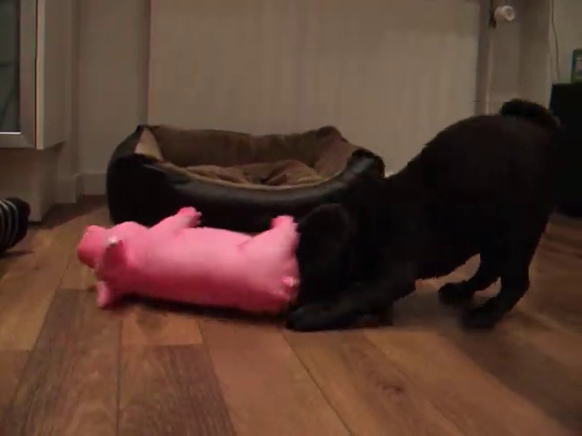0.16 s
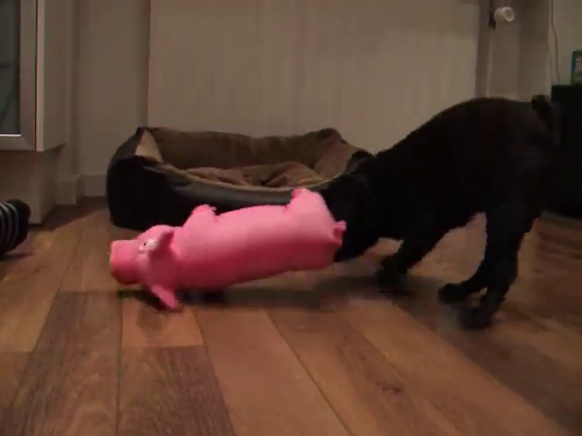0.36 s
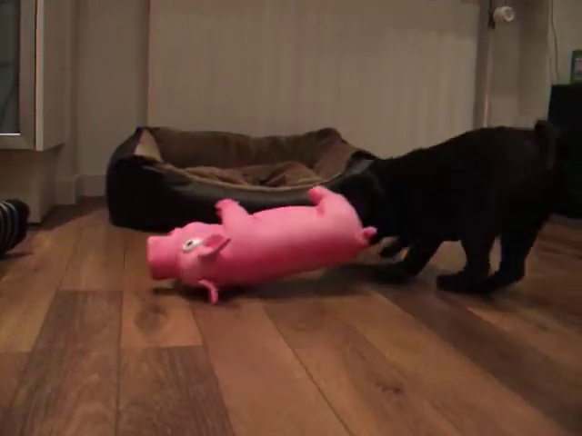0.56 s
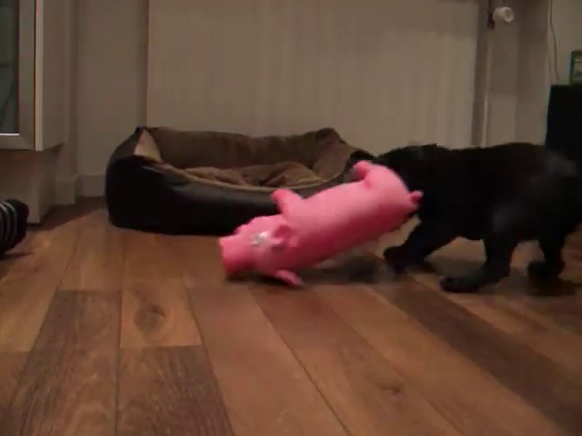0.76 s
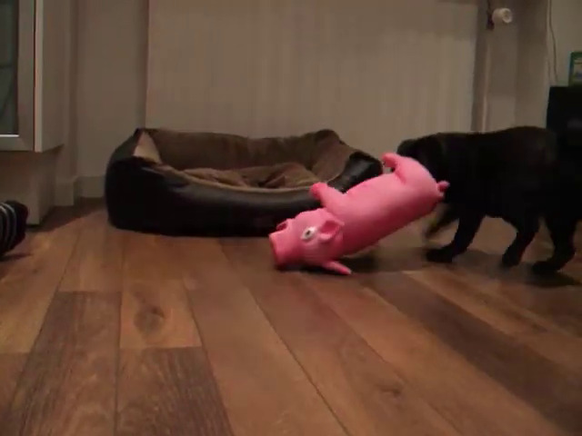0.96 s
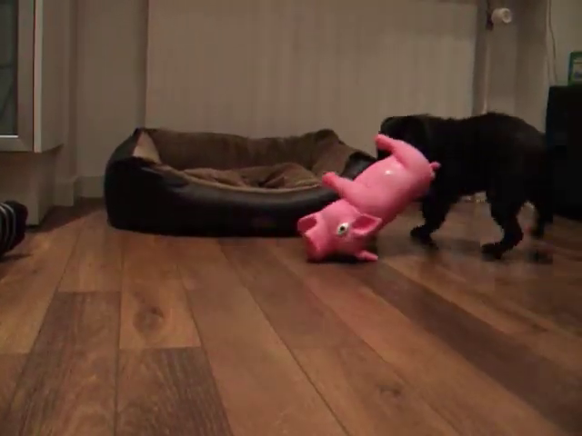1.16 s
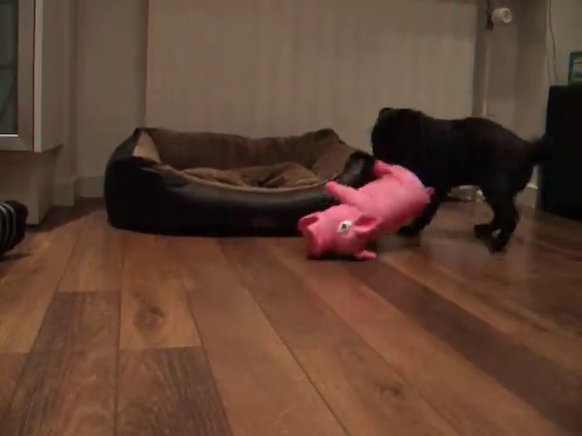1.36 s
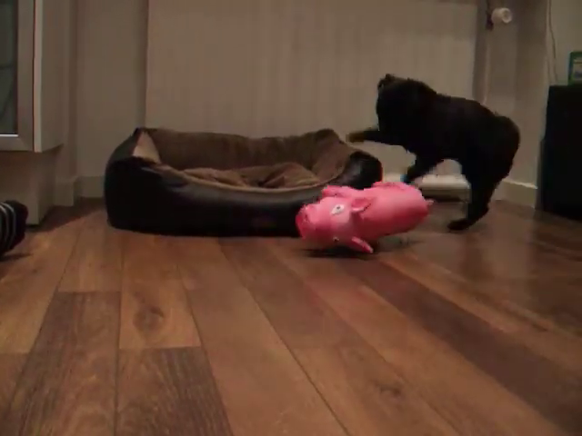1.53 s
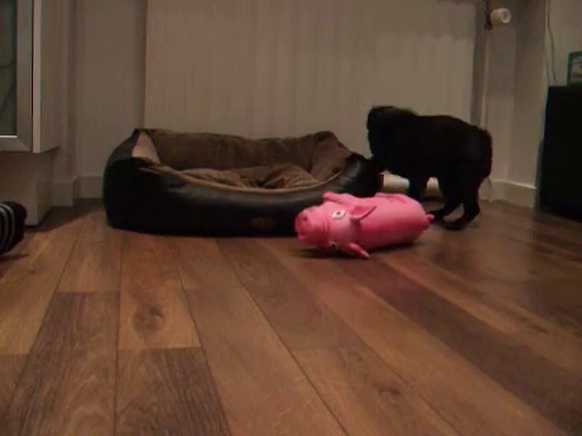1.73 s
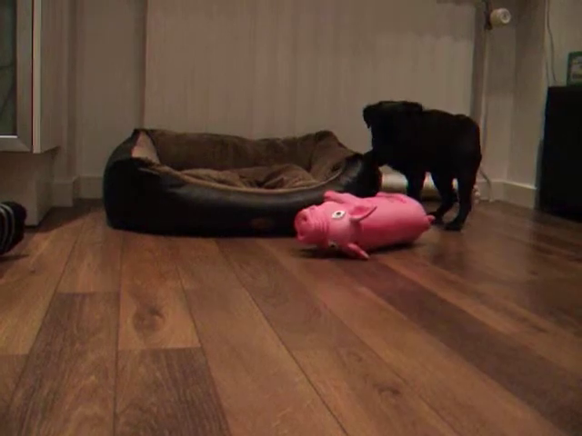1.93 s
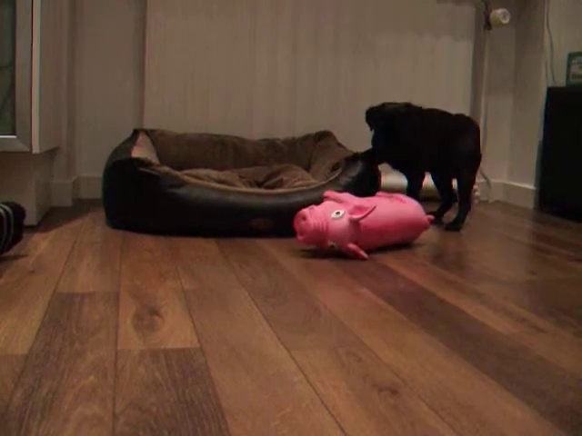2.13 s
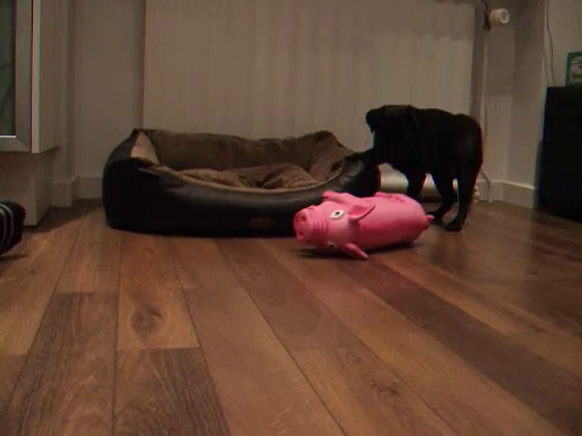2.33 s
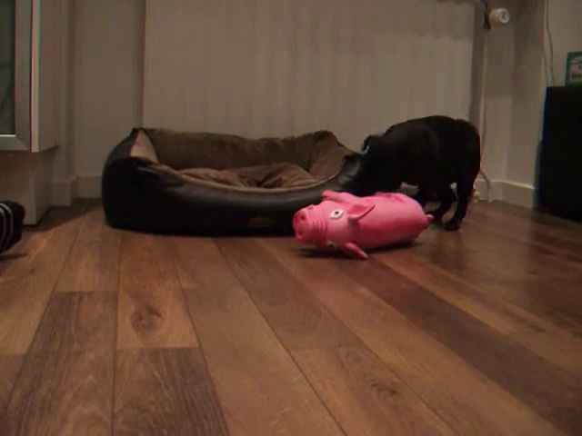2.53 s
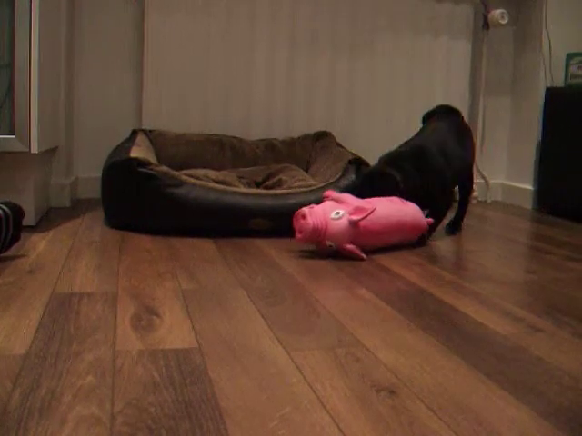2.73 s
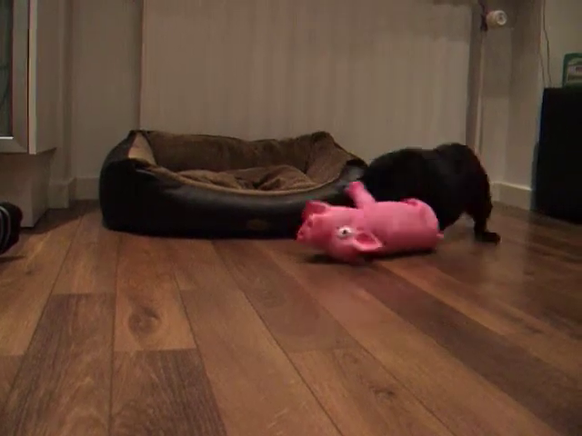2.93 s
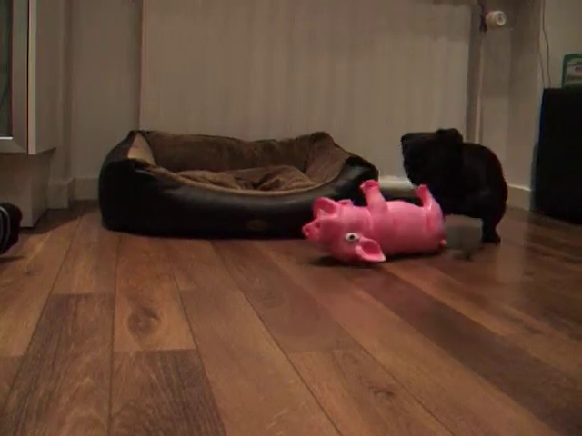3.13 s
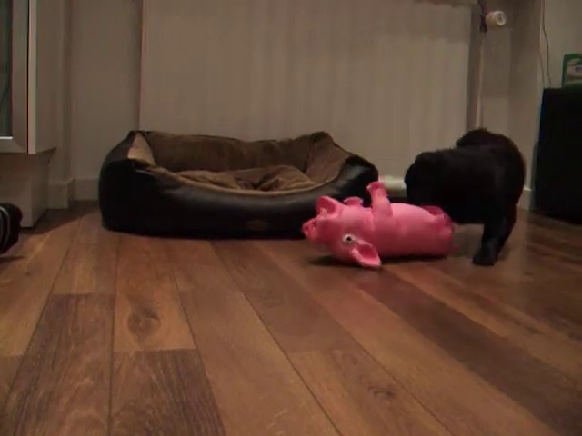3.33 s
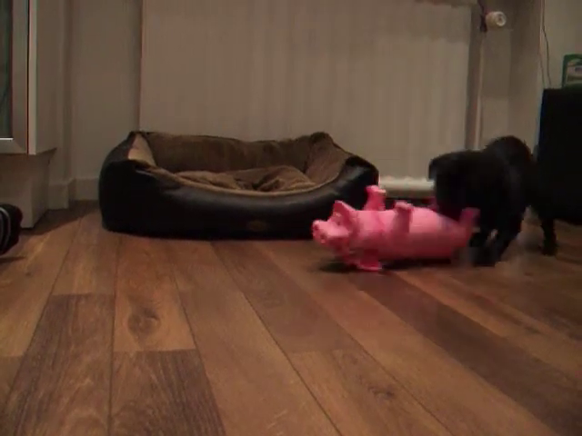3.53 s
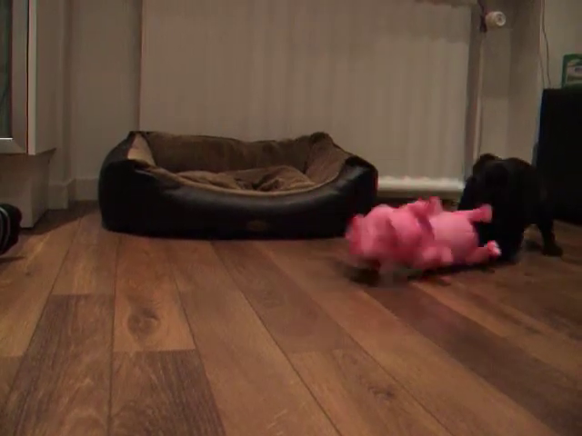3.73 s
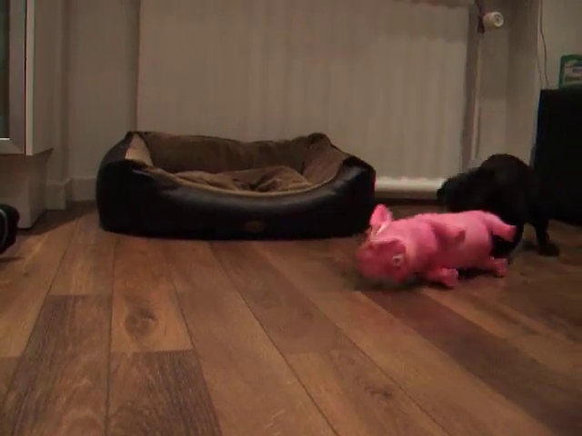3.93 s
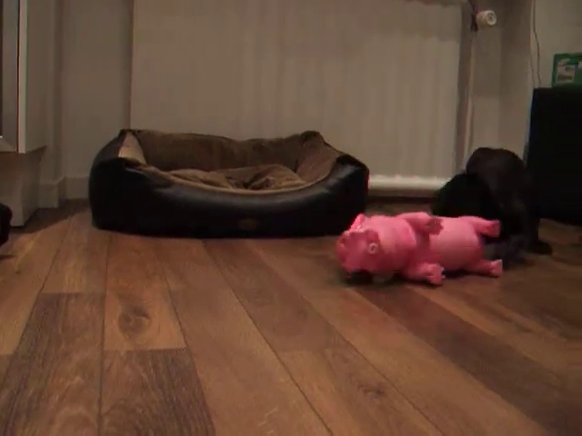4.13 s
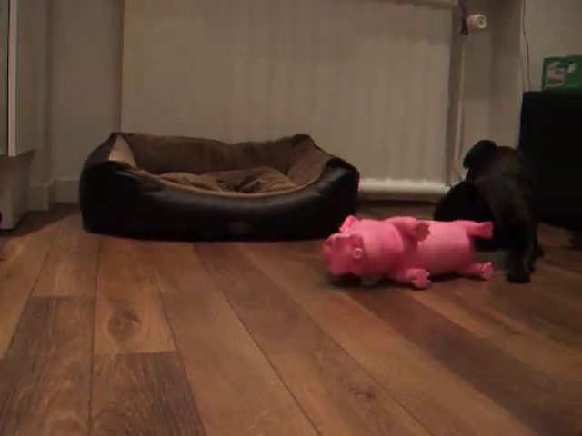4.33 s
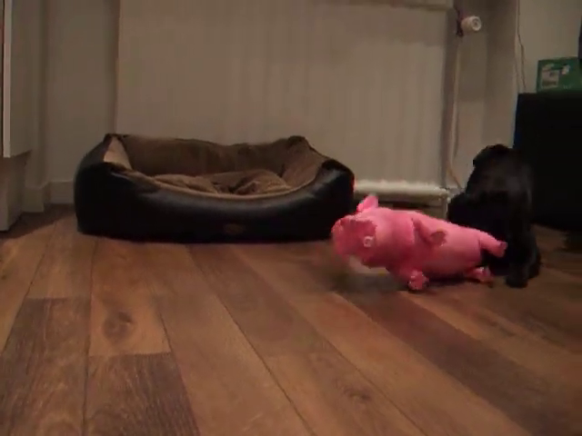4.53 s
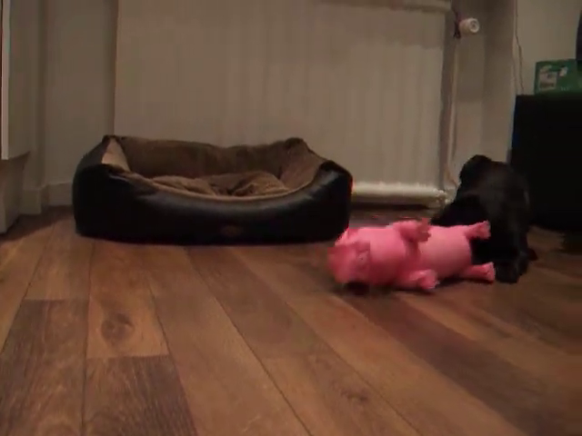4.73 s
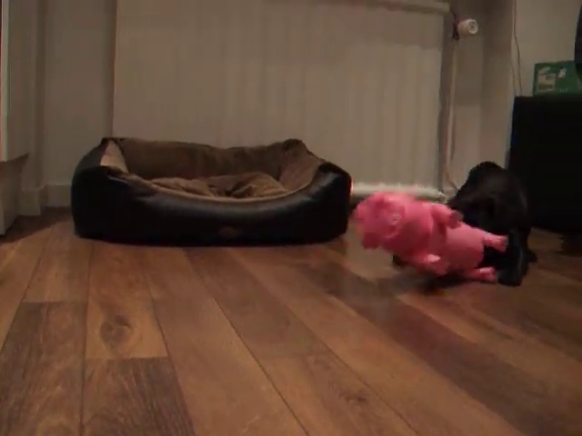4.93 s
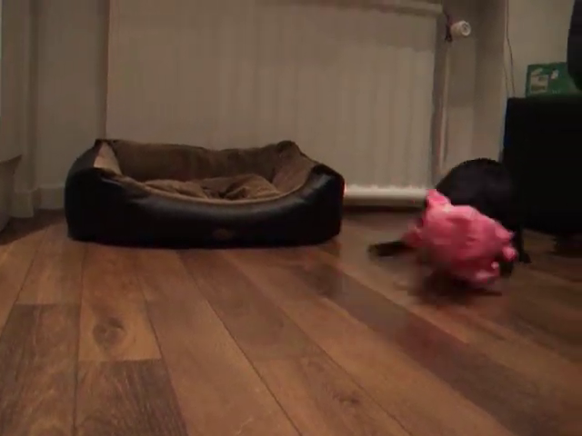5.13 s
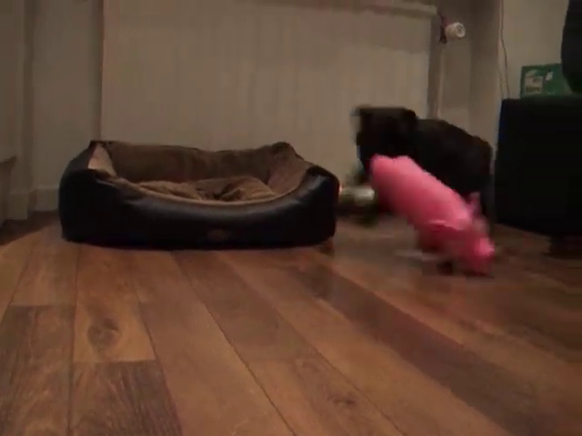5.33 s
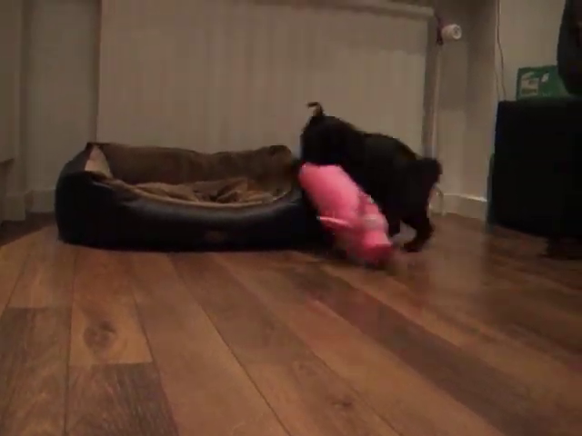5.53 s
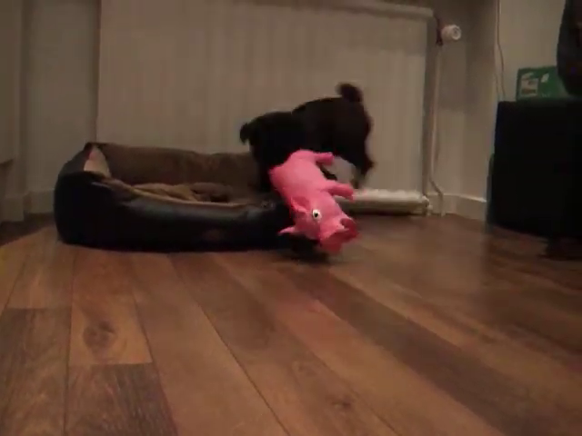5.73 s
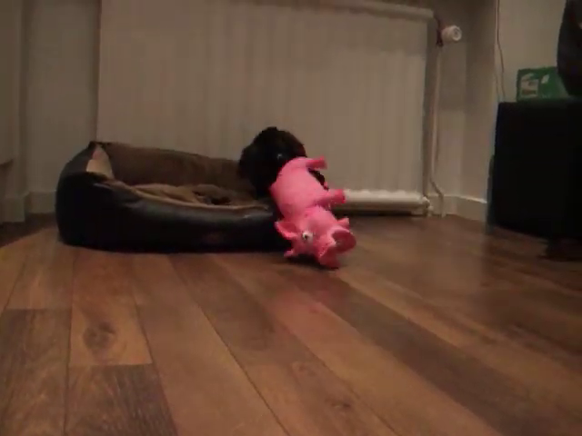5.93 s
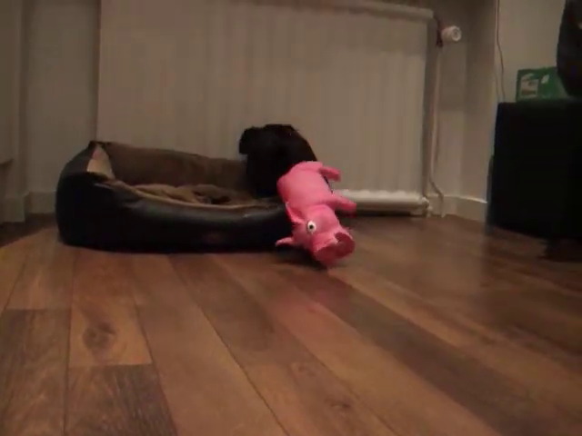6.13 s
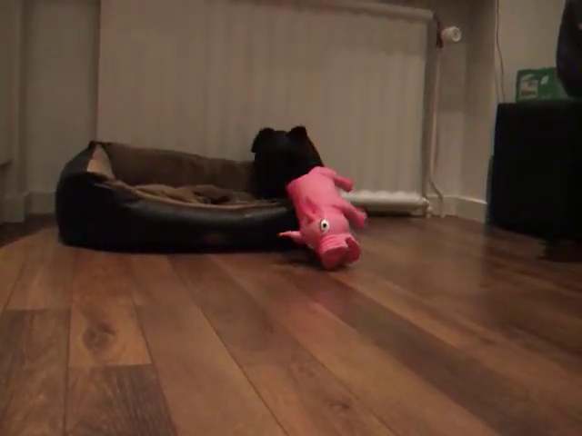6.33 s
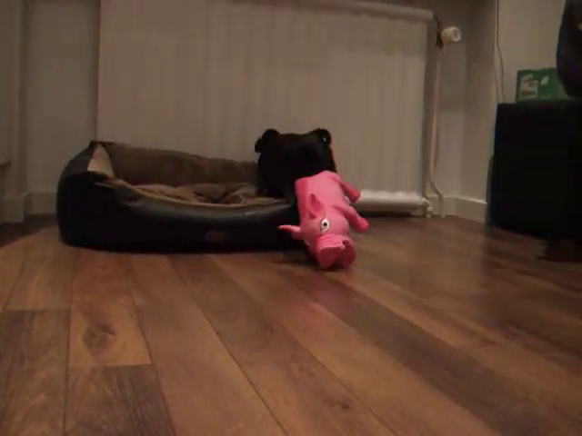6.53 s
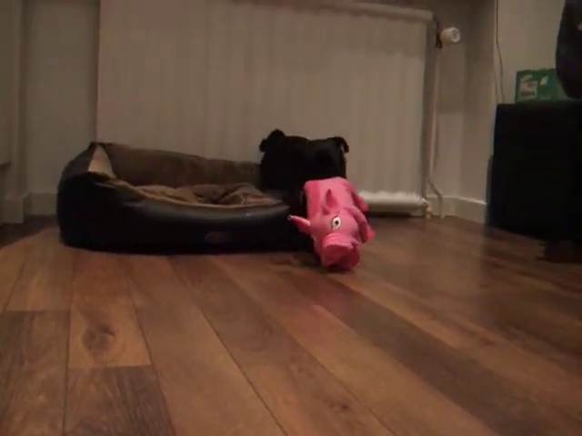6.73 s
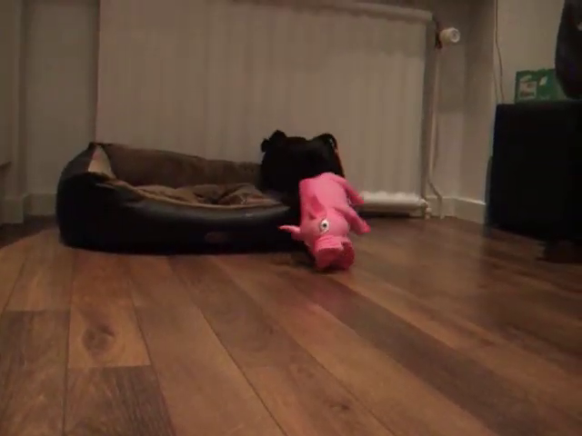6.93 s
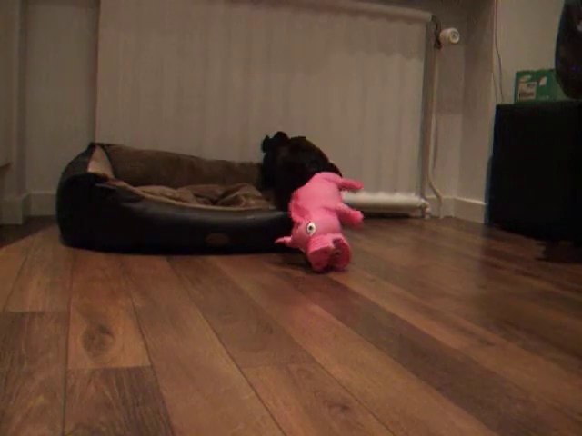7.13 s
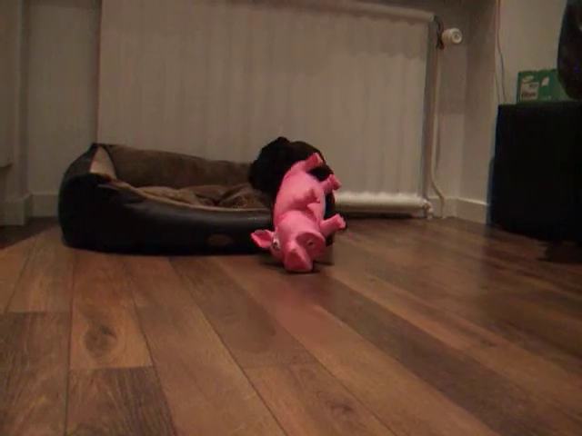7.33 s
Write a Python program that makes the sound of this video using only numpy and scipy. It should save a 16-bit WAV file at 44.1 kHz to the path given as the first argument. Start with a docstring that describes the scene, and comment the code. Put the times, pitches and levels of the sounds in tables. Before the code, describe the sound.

In a small room, a dog snuffles and its claws tick on wooden boards while a rubber toy judders along the floor. Then the pig toy is squeezed into a run of raspy grunts. Everything stops for a moment before the toy's grunts return, alternating with wet sniffs, short snorts and dull bumps. It is heard from a few steps away, over low hiss and a faint high whine.

```python
"""A small room with a wooden floor, a camera's microphone a few steps from a pug and its rubber pig.
The dog sniffs and snorts, then shoves the hollow toy, which judders over the boards as claws click.
At 1.5 s the pig starts to grunt: each squeeze and refill rattles a flap, about fifty beats a second,
into a short pipe. The dog stands still briefly, leaving hiss and the camera's thin whine. From 2.6 s
grunts, snorts and sniffs take turns, and paws and toy land with soft thumps."""
import sys
import numpy as np
from scipy import signal
from scipy.fft import irfft
from scipy.io import wavfile
from scipy.ndimage import uniform_filter1d

SR = 44100
rng = np.random.default_rng(int(sys.argv[2]) if len(sys.argv) > 2 else 0)


def to_wav(sig):
    """Store sig (one row per channel, or 1-D mono) as 16-bit WAV at the path in sys.argv[1].

    Samples outside -1..1 are clipped; the rate is SR.
    """
    pcm = np.clip(np.atleast_2d(sig), -1, 1) * 32767
    pcm = np.round(pcm).astype(np.int16)
    wavfile.write(sys.argv[1], SR, pcm.T)  # frames by channels


N = 329150
EDGE_HZ = 8650  # top of the camera's band
HZ = np.fft.rfftfreq(4096, 1 / SR) + 1  # frequency axis of the tone curves

# the pig's grunts: first_beat_s, last_beat_s, beats_per_s, first_db, middle_db, last_db, boom_db
GRUNTS = [(1.511, 1.523, 90, -27, -22, -23.5, -1), (1.669, 1.748, 45, -26.5, -30.5, -33.5, 1),
          (1.822, 1.843, 52, -32, -36, -32.5, 3.5), (1.937, 1.958, 62, -36, -36, -43, 0),
          (2.026, 2.045, 45, -43.5, -47, -63, -7), (2.711, 2.844, 59, -33, -20, -26.5, 8),
          (3.307, 3.42, 48.8, -35.5, -28, -35.5, -1), (3.877, 3.923, 51, -29.5, -33, -48, 4),
          (4.057, 4.191, 51.2, -29.5, -26, -24.5, 1), (4.305, 4.546, 50.5, -30, -27.5, -39.5, -2.5),
          (4.766, 4.834, 58.3, -32.5, -22.5, -22.5, 10), (5.619, 5.683, 49, -34, -33, -33.5, -7),
          (6.307, 6.365, 54.5, -32, -22, -23.5, -2.5), (6.794, 6.876, 51, -33.5, -28, -34, -4.5),
          (7.073, 7.217, 52, -39.5, -30, -39.5, -3)]
# tone of the flap heard through the pig's snout: frequency_hz, gain_db
FLAP_TONE = [(120, -5.5), (420, -5.5), (580, -1.5), (880, -3.5), (1270, -0.5), (1950, 4), (2500, -0.5),
             (2950, -8), (3750, -4), (4650, -1.5), (5450, -11.5), (6350, -12.5), (7300, -24)]
# the dog's snorts: start_s, length_s, level_db, mouth_hz, mouth_glide_octaves, mouth_lift_db,
# nose_hz, nasal_treble_db, palate_flutters_per_s, flutter_depth (0-1)
SNORTS = [(0.266, 0.095, -21, 1435, -0.36, 12.5, 4200, 7.5, 45, 0.37),
          (2.905, 0.056, -21.5, 1780, 0.082, 14, 1046, 6.5, 99, 0.05),
          (2.97, 0.05, -30.5, 2870, -0.16, 26, 3480, -19, 97, 0.5),
          (3.685, .088, -26, 2300, -0.094, 18.5, 4400, 14.5, 87, 0.8),
          (5.435, 0.083, -29, 3180, 0.036, 8, 1740, 8.5, 80, 0.3),
          (5.757, 0.087, -42.5, 2680, -0.095, 16, 1793, 16, 71, 0.01),
          (6.575, 0.09, -28, 2563, 0.17, 14.5, 3860, 16.5, 130, 0.2)]
# tone of the dog's airway: frequency_hz, gain_db
AIRWAY_TONE = [(80, -12), (350, -7), (630, 5.5), (950, 1), (1800, -5.5), (2900, -12), (4500, -5),
               (5400, -13), (7400, -13)]
# the dog's sniffs: start_s, peak_s, end_s, peak_db, hiss_centre_hz, hiss_width_octaves
SNIFFS = [(0.02, 0.264, 0.31, -36.5, 4740, 1.05), (0.363, 0.388, 0.39, -20, 6300, 1.3),
          (0.388, 0.395, 0.59, -36, 4060, 1.1), (1.382, 1.43, 1.556, -28, 5560, 0.56),
          (2.631, 2.659, 2.74, -34, 5500, 0.87), (2.86, 2.9, 3.09, -32.5, 7300, 0.78),
          (3.147, 3.293, 3.46, -41, 5900, 1.6), (3.559, 3.716, 3.8, -27.5, 7700, 0.42),
          (4.949, 4.979, 5.13, -44.5, 4600, 0.36), (5.191, 5.329, 5.37, -29, 6500, 2.6),
          (5.377, 5.392, 5.38, -32.5, 4700, 0.19), (5.883, 5.89, 6.17, -39.5, 1200, 4.2),
          (5.883, 5.988, 6.17, -37.5, 6000, 0.58), (6.385, 6.54, 6.72, -32, 6200, 0.51)]
# tone of the nostrils under every sniff: frequency_hz, gain_db
NOSTRIL_TONE = [(100, -7), (600, 3), (1600, 1.5), (3200, -6), (7500, -3), (9000, -15.5)]
# shoves of the toy over the boards: start_s, length_s, level_db, slips_per_s, jolt_db,
# grip_roughness (1 and above is all noise)
SHOVES = [(0.73, 0.036, -37, 202, 0, 0.48), (0.806, 0.056, -44, 235, -1, .3),
          (0.855, 0.18, -33.5, 274, 10, 1.23), (1.011, 0.11, -34, 279, 5.5, 0.87),
          (5.298, 0.022, -30.5, 296, 6.5, 0.48)]
# resonances of the pig's hollow body: centre_hz, width_hz, gain_db
BODY_MODES = [(255, 51, 7), (363.6, 14, 12), (422, 20, -12), (656, 82, 0.5)]
# paws and toy landing on the floor: start_s, level_db, pitch_hz
THUMPS = [(0.088, -45, 520), (0.394, -43, 186), (1.344, -39.5, 413), (1.5, -35.5, 417), (1.636, -37, 388),
          (1.713, -39.5, 166.5), (2.748, -38.5, 241.6), (3.221, -36, 368.9), (3.23, -41.5, 119),
          (3.72, -34.5, 210), (4.532, -46.5, 166), (5.302, -36.5, 96), (5.433, -35.5, 252),
          (5.578, -37, 174.8), (5.95, -33, 193), (6.001, -41.5, 401), (6.59, -41.5, 220),
          (7.37, -46.5, 281)]
# claws striking the boards: start_s, level_db, centre_hz
CLAW_CLICKS = [(0.274, -23.5, 5440), (1.016, -28, 5350), (0.862, -37.5, 4400), (1.041, -35, 4470),
               (1.151, -23, 4570), (1.171, -22, 4850), (1.411, -20, 4500), (1.431, -31, 4600),
               (1.5, -23.5, 4800), (3.227, -28, 4200), (3.325, -28.5, 5080), (3.852, -39, 7600),
               (5.204, -27, 5130), (5.46, -27.5, 3740), (5.541, -17, 4700), (5.980, -24, 4008),
               (6.509, -24, 6300)]
# steady hiss and rumble at the microphone: frequency_hz, gain_db
HISS_TONE = [(26, 1.5), (45, 5.5), (90, 0), (300, 3), (1200, 0.5), (6000, -6.5), (7400, 0), (8100, -21)]
# the camera's thin whine: pitch_hz, level_db
CAMERA_WHINE = [(7705, -58.5), (8320, -67)]
# the room's ring: frequency_hz, t60_s
ROOM_DECAY = [(100, .4), (500, .36), (1500, .39), (4000, .39), (8000, .33)]


def grunter(level_db=1.0, uneven_db=0.56, open_db=-5, lead_s=0.0018, pipe_hz=421.4, end_echo=0.54,
            boom_hz=450, rasp=0.95, brighten=0.67, usual_db=-25):
    """Each cycle the flap flicks open, then slaps shut and rings the pipe; air pressure sets the level."""
    out = np.zeros(N)
    for first_s, last_s, rate, *pressure_db, boom_db in GRUNTS:
        pressure_curve = np.polyfit([0, .5, 1], pressure_db, 2)
        # a hard squeeze both booms and rasps; a refill is thin and dull
        squeeze_db = boom_db * (hump(boom_hz, 0.53) + rasp * hump(7500, 0.15))
        for progress in np.linspace(0, 1, round((last_s - first_s) * rate) + 1):
            slap_s = first_s + progress * (last_s - first_s)
            beat_db = np.polyval(pressure_curve, progress)
            flexed_hz = pipe_hz * (1 + 0.0052 * rng.standard_normal())  # the soft pipe flexes
            # closed at the flap, the pipe rings at odd multiples of its lowest mode
            echo = end_echo * np.exp(-1j * np.pi * HZ / flexed_hz)
            pipe = amp(curve(FLAP_TONE)) / abs(1 + echo)
            bright_db = brighten * (beat_db - usual_db) * hump(5500, 0.62)
            tone = pipe * amp(squeeze_db + bright_db)
            opening_s = -lead_s * (1 + rng.standard_normal() / 10)
            for lag_s, stroke_db in (opening_s, open_db), (0, 0):
                flick = snap(decay_s=0.0023, grit=2.2)
                gain = amp(level_db + beat_db + stroke_db + uneven_db * rng.standard_normal())
                add(out, slap_s + lag_s, gain * colour_same_energy(flick, tone))
    return out


def snorts(level_db=-1, attack_s=0.00078, release_s=0.036, sag_db=-3, jitter=0.12, nose_db=7):
    """Air bursts through the short nose, chopped unevenly by the soft palate, as the mouth changes shape."""
    out = np.zeros(N)
    for start_s, length_s, db, mouth_hz, glide, mouth_db, nose_hz, treble_db, rate, depth in SNORTS:
        t = clock(2 * length_s)
        release = np.exp(-np.maximum(t - length_s, 0) / release_s)
        flow = np.minimum(t / attack_s, 1) * amp(sag_db * t / length_s) * release
        cycles = np.cumsum(rate * np.exp(jitter * wander(len(t), span=300))) / SR
        flutter = unit_rms(np.exp(-(cycles % 1) / 0.27))
        chop = unit_rms(1 - depth + depth * flutter)
        air = flow * chop * wet_air(len(t), sputter_db=2, grain_samples=60)
        nasal_db = curve(AIRWAY_TONE) + nose_db * hump(nose_hz, 0.11) + treble_db * hump(6440, 0.12)
        # crossfade from the first mouth shape to the last
        progress = np.minimum(t / length_s, 1)
        for share, octaves in (1 - progress, -glide / 2), (progress, glide / 2):
            airway = amp(nasal_db + mouth_db * hump(mouth_hz * 2 ** octaves, 0.39))
            add(out, start_s, amp(level_db + db) * colour(share * air, airway))
    return out


def sniffs(level_db=-1, range_db=16, lift_db=13):
    """Hiss swells and dies in the nostrils; moisture makes it sputter."""
    out = np.zeros(N)
    for start_s, peak_s, end_s, db, centre_hz, octaves in SNIFFS:
        t = clock(end_s - start_s)
        swell_db = np.interp(t + start_s, [start_s, peak_s, end_s], [-range_db, 0, -range_db])
        flow = amp(swell_db) * signal.windows.tukey(len(t), .1)
        flow *= np.minimum(2 * t / abs(peak_s - start_s), 1)
        hiss = flow * wet_air(len(t), sputter_db=3, grain_samples=90)
        nostrils = amp(curve(NOSTRIL_TONE) + lift_db * hump(centre_hz, octaves))
        add(out, start_s, amp(level_db + db) * colour(hiss, nostrils))
    return out


def rubber_judder(grip_s=.007, jolt_s=0.04, settle_s=0.055, release_s=0.025, jitter=0.065, overtone_db=-4):
    """Shoved rubber grips with a ragged jolt, then settles into even slips that sound the hollow body."""
    out = np.zeros(N)
    body = resonances(BODY_MODES) / (1 + (HZ / 1100) ** 2)
    for start_s, length_s, db, slip_hz, jolt_db, grip_roughness in SHOVES:
        t = clock(length_s + 0.1)
        release = np.exp(-np.maximum(t - length_s, 0) / release_s)
        force = np.minimum(t / grip_s, 1) * amp(jolt_db * np.exp(-t / jolt_s)) * release
        roughness = np.clip(grip_roughness * np.exp(-t / settle_s), 0, 1)
        cycles = np.cumsum(slip_hz * (1 + jitter * roughness * wander(len(t), span=200))) / SR
        slips = sum(amp(overtone_db * k) * np.cos(2 * np.pi * (k + 1) * cycles) for k in range(4))
        even = unit_rms(colour(slips, body)[:len(t)])
        ragged = unit_rms(colour(rng.standard_normal(len(t)), body)[:len(t)])
        judder = np.sqrt(1 - roughness) * even + np.sqrt(roughness) * ragged
        add(out, start_s, amp(db) * force * judder)
    return out


def thumps(level_db=6, ring_s=.014, scuff_db=-6):
    """Paws and toy land with a short dull knock and a little scuff."""
    out, t = np.zeros(N), clock(10 * ring_s)
    for start_s, db, pitch_hz in THUMPS:
        knock = np.sin(2 * np.pi * pitch_hz * t) * np.minimum(t * pitch_hz, 1) * np.exp(-t / ring_s)
        add(out, start_s, amp(level_db + db) * knock)
        add(out, start_s, amp(level_db + db + scuff_db) * scuff(pitch_hz, decay_s=0.05))
    return out


def claw_clicks(lift_db=23, skid_s=0.0011):
    """A hard claw skids for an instant and gives a short bright tick."""
    out, t = np.zeros(N), clock(10 * skid_s)
    for start_s, db, centre_hz in CLAW_CLICKS:
        skid = unit_rms(t * np.exp(-t / skid_s) * rng.choice([-1, 1], len(t))) / 2
        add(out, start_s, amp(db) * colour(skid, amp(lift_db * hump(centre_hz, 0.68))))
    return out


def scuffle(step_s=.09, stop_s=1.8, resume_s=2.64, spread_db=5.5, scrape_db=-53, pad_db=-57, board_db=-67):
    """Light quick steps, except while the dog stands still: claws scrape, pads pat, boards give."""
    out = np.zeros(N)
    for start_s in np.r_[np.arange(.03, stop_s, step_s), np.arange(resume_s, N / SR, step_s)]:
        for db, band_hz in (scrape_db, 4000), (pad_db, 300), (board_db, 85):
            lag_s = step_s * rng.random() / 2
            gain = amp(db + spread_db * rng.standard_normal())
            add(out, start_s + lag_s, gain * scuff(band_hz, decay_s=0.098))
    return out


def room(x, wet_db, build_s=0.0009):
    """Dense reflections off floor and walls reach the microphone, each band dying at its own speed."""
    t = clock(.7)
    reflections = rng.standard_normal(len(t)) * (rng.random(len(t)) < .1) * (1 - np.exp(-t / build_s))
    hz, age_s, bands = signal.stft(reflections, SR, nperseg=256)
    decay = amp(-60 * age_s / curve(ROOM_DECAY, hz)[:, None])
    _, tail = signal.istft(bands * decay, SR, nperseg=256)
    return x + amp(wet_db) * signal.fftconvolve(x, tail / np.linalg.norm(tail))[:N]


def background(hiss_db=-54, drift_rad=0.022):
    """Steady hiss and low rumble, with the camera's slightly unsteady whine."""
    out = amp(hiss_db) * unit_rms(colour(rng.standard_normal(N), amp(curve(HISS_TONE)))[:N])
    for pitch_hz, db in CAMERA_WHINE:
        phase = np.cumsum(2 * np.pi * pitch_hz / SR + drift_rad * rng.standard_normal(N))
        out += amp(db) * np.sqrt(2) * np.sin(phase)
    return out


def snap(decay_s, grit):
    """A sharp impulse trailed by a puff of noise, with the energy of 2.5 ms at 0 dB."""
    t = clock(.02)
    puff = rng.standard_normal(len(t)) * np.exp(-t / decay_s)
    puff *= grit / np.linalg.norm(puff)
    puff[0] += 1
    return puff / np.linalg.norm(puff) * np.sqrt(SR / 400)


def wet_air(samples, sputter_db, grain_samples):
    """Turbulent air, made grainy by moisture."""
    grains = np.clip(wander(samples, grain_samples), -2, 2)
    return unit_rms(amp(sputter_db * grains)) * rng.standard_normal(samples)


def scuff(hz, decay_s, slope=1.63):
    """A soft blow: a puff of noise in one broad band near hz."""
    t = clock(5 * decay_s)
    push = rng.standard_normal(len(t)) * np.minimum(2 * t / decay_s, 1) * np.exp(-t / decay_s)
    band = 1 / ((HZ / hz / 1.17) ** slope + (hz / HZ / 1.46) ** slope)
    return colour_same_energy(push, band)


def wander(samples, span):
    """Noise of rms 1, smoothed over span samples."""
    return unit_rms(uniform_filter1d(rng.standard_normal(samples), size=span))


def colour(x, gain):
    """Causal filter of unit energy, shaped by gain over HZ and rolled off above EDGE_HZ."""
    rolled_off = gain / gain.max() / np.sqrt(1 + (HZ / EDGE_HZ) ** 16)
    log_gain = np.log(np.maximum(rolled_off, 1e-4))
    mirrored = np.r_[log_gain, log_gain[-2:0:-1]]
    minimum_phase = np.exp(np.conj(signal.hilbert(mirrored)))
    taps = irfft(minimum_phase[:len(HZ)])
    return signal.fftconvolve(x, taps / np.linalg.norm(taps))


def colour_same_energy(x, gain):
    """Colours x and keeps its energy."""
    sound = colour(x, gain)
    return sound * np.linalg.norm(x) / np.linalg.norm(sound)


def resonances(modes):
    """Gain over HZ of resonances summed in power."""
    return np.sqrt(sum(amp(db) ** 2 / (1 + ((HZ ** 2 - hz ** 2) / (HZ * width_hz)) ** 2)
                       for hz, width_hz, db in modes))


def curve(points, hz=HZ):
    """Joins the points of a spectrum on a log-frequency axis."""
    point_hz, values = np.transpose(points)
    return np.interp(np.log(hz + 1), np.log(point_hz + 1), values)


def hump(hz, octaves):
    """A bell of height 1 around a frequency."""
    return np.exp(-.5 * (np.log2(HZ / hz) / octaves) ** 2)


def amp(db):
    """Decibels to gain."""
    return 10 ** (np.asarray(db) / 20)


def unit_rms(x):
    """Scales to rms 1."""
    return x / np.sqrt(np.mean(x ** 2) + 1e-20)


def clock(length_s):
    """Sample times from zero to length_s."""
    return np.arange(max(int(length_s * SR), 2)) / SR


def add(mix, start_s, sound):
    """Mixes a sound in at start_s."""
    part = mix[max(round(start_s * SR), 0):][:len(sound)]
    part += sound[:len(part)]


def scene():
    """Dog and toy on the wooden floor, a few steps from the microphone."""
    dog = room(snorts() + sniffs(), wet_db=-3.5) + room(claw_clicks() + scuffle(), wet_db=-2.5)
    toy = room(grunter(), wet_db=-3.0) + room(thumps(), wet_db=-2.5) + room(rubber_judder(), wet_db=-12.0)
    return (dog + toy + background())[None]


def record(dry):
    """A small camera's mono microphone: narrow band and a slight constant offset."""
    offset = -.0024
    low_pass = signal.firwin(101, EDGE_HZ, window=("kaiser", 8), fs=SR)
    return signal.oaconvolve(dry, low_pass[None], "same") + offset


dry = scene()
out = record(dry)
to_wav(out)
```